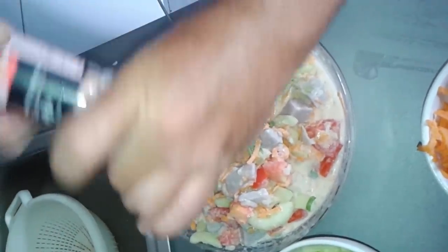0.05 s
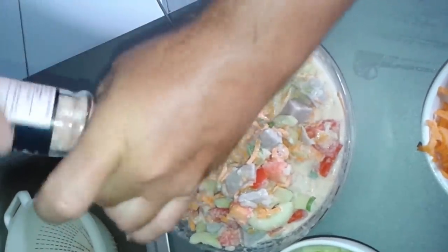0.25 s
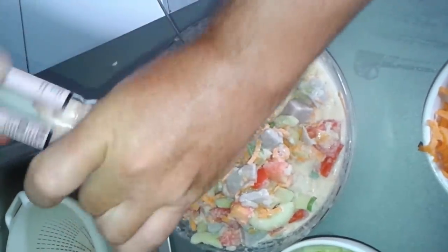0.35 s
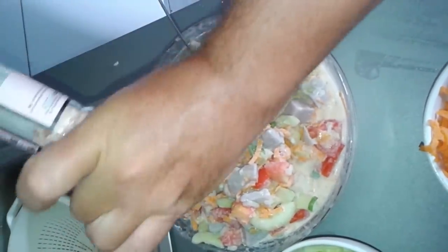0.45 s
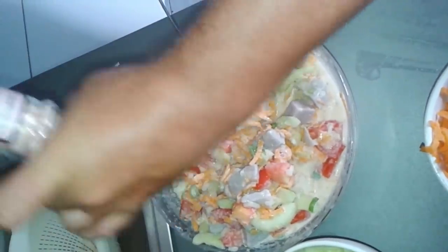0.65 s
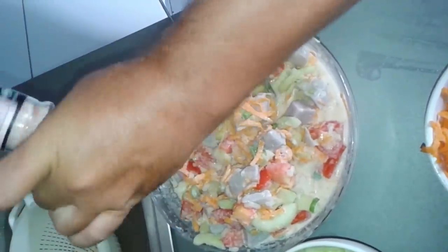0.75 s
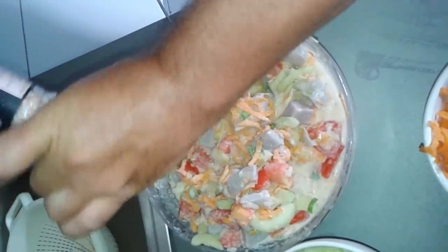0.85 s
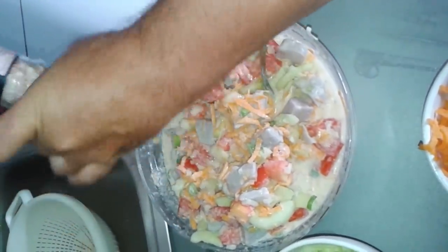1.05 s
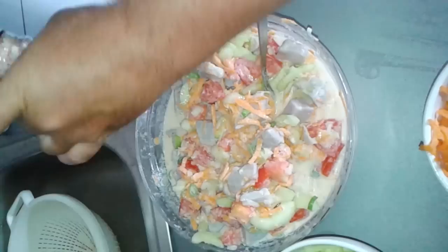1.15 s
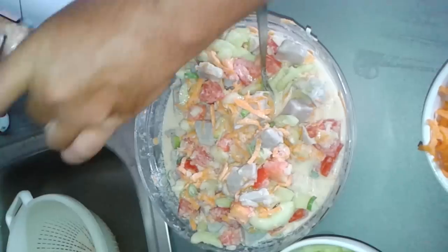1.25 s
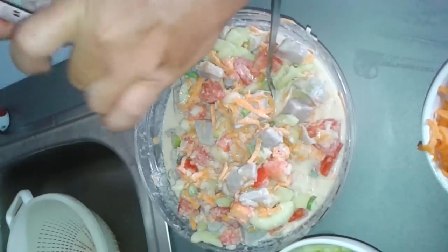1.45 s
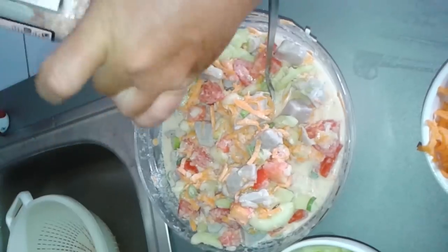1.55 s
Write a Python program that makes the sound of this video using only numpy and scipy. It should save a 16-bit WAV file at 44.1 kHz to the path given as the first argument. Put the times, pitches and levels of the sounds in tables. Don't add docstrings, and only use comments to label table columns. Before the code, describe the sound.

Coarse salt crystals crack and snap in a hand grinder, with loose grains ticking between twists

```python
import sys
import numpy as np
from scipy import signal
from scipy.fft import rfft, irfft, next_fast_len
from scipy.io import wavfile
from scipy.ndimage import map_coordinates

SR = 44100
rng = np.random.default_rng(int(sys.argv[2]) if len(sys.argv) > 2 else 0)


def convert_level_to_amplitude(level_db):
    exponent = np.asarray(level_db, float) / 20
    return 10 ** exponent


def store_pcm(level_fs):
    pcm = np.round(np.clip(level_fs, -1, 1) * 32767).astype(np.int16)
    wavfile.write(sys.argv[1], SR, np.atleast_2d(pcm).T)


N = 70560
LEAD = SR // 4
M = N + LEAD
T_S = (np.arange(M) - LEAD) / SR


def unit(x):
    return x / np.sqrt(np.mean(x ** 2) + 1e-20)


def along(points, hz):
    f, v = np.transpose(points)
    return np.interp(np.log(hz + 1), np.log(f + 1), v)


def filtered(x, response):
    m = next_fast_len(x.shape[-1] + 8192)
    hz = np.fft.rfftfreq(m, 1 / SR)
    return irfft(rfft(x, m) * response(hz), m)[..., :x.shape[-1]]


# f/Hz, density/dB per Hz
HUM_SPECTRUM = [(15, -12), (40, -17.5), (110, -10), (152, 3.5), (185, -7), (270, -2.5), (450, -14.5),
                (1000, -18.5)]
# f/Hz, density/dB per Hz
AIR_SPECTRUM = [(500, -64), (1000, 2), (2300, -11), (4500, -12), (7000, -5), (12000, -13), (15000, -10)]


def floor():
    hum_db, air_db, swell_db, swells_per_s = -51.5, -61, 1.5, 12

    def noise(points):
        top_hz = points[-1][0]
        return filtered(rng.standard_normal(M), lambda hz: convert_level_to_amplitude(along(points, hz) - 120 * (hz > top_hz)))

    wander = map_coordinates(rng.standard_normal(40), [np.arange(M) * swells_per_s / SR])
    hum = convert_level_to_amplitude(hum_db) * convert_level_to_amplitude(swell_db * wander) * unit(noise(HUM_SPECTRUM))
    return hum + convert_level_to_amplitude(air_db) * unit(noise(AIR_SPECTRUM))


# f/Hz, t60/s
KITCHEN_T60 = [(500, .5), (2000, 0.49), (6000, 0.41), (13000, .33)]


def kitchen(x):
    tails, delay = 12, 200
    hz, t, z = signal.stft(rng.standard_normal((tails, SR * 3 // 4)), SR, nperseg=256)
    decay = convert_level_to_amplitude(-60 * t / along(KITCHEN_T60, hz)[:, None])
    tail = signal.istft(z * decay, SR, nperseg=256)[1]
    tail = tail / np.linalg.norm(tail[0])
    position = np.arange(M) * (tails - 1) / M
    share = np.clip(1 - np.abs(position - np.arange(tails)[:, None]), 0, 1)
    wet = signal.fftconvolve(x * np.sqrt(share), tail, axes=1).sum(0)
    return np.pad(wet, (delay, 0))[:M]


# t/s, level/dB, f/Hz
CAP_JOLTS = [
    (0.2692, -32, 556),
    (0.2754, -35.5, 400),
    (.312, -34, 319),
    (0.673, -36, 472),
    (.752, -34.5, 347),
    (1.152, -35, 400),
]


def thuds():
    decay_cycles = 1.4
    out = np.zeros(M)
    for s, db, hz in CAP_JOLTS:
        cycles = hz * np.maximum(T_S - s, 0)
        out += convert_level_to_amplitude(db) * np.sin(2 * np.pi * cycles) * np.exp(-cycles / decay_cycles)
    return out


def body(x, peaks):
    low_cut_hz = 842

    def response(f):
        ring = 0
        for k, (centre, width, db) in enumerate(peaks):
            ring = ring + (-1) ** k * convert_level_to_amplitude(db) * 1j * f * width / (centre ** 2 - f * f + 1j * f * width)
        radiated = (-f * f / (low_cut_hz ** 2 - f * f + 1j * f * low_cut_hz)) ** 2
        return ring * radiated

    return filtered(x, response)


def bursts(times, gains, decay_s, rise_s):
    t = np.arange(SR // 50) / SR
    shape = (1 - np.exp(-t / rise_s)) * np.exp(-t / decay_s)
    start = np.round(times * SR).astype(int) + LEAD
    where = np.clip(start[:, None] + np.arange(len(t)), 0, M - 1).ravel()
    noise = rng.standard_normal((len(times), len(t))) * shape
    noise *= np.linalg.norm(shape / shape.max()) / np.linalg.norm(noise, axis=1)[:, None]
    return [np.bincount(where, (g[:, None] * noise).ravel(), M) for g in gains]


def struck(events, decay_s, rise_s):
    strike_db = 8.5
    s, db, low_db, high_db = np.transpose(events)
    return bursts(s, convert_level_to_amplitude(strike_db + db + np.array([low_db, high_db])), decay_s, rise_s)


# f/Hz, width/Hz, level/dB
CAP_MODES = [(1609, 342, -9.5), (2254, 527, -0.5), (3610, 1760, -7.5)]
# f/Hz, width/Hz, level/dB
JAR_MODES = [(2350, 900, -6), (5900, 1100, -4), (6950, 900, 0), (9800, 1800, -8)]
# t/s, peak level/dB, share in cap/dB, share in jar/dB
SALT_TICKS = [(.062, -40, -4, -4), (.1096, -42, -2, -6), (.1225, -39, -9, -1), (.1324, -41, -12, -1),
              (.1555, -35, 0, -10), (.1735, -40, -9, -1), (.5931, -41, -3, -4), (.623, -41, -9, -1),
              (.6305, -40, -9, -1), (1.0585, -41, -15, 0), (1.068, -40, 0, -14), (1.094, -45, -9, -1),
              (1.508, -43, -4, -4), (1.5574, -40, -5, -2), (1.5753, -39, -6, -2)]
# start t/s, end t/s, level/dB
SALT_SLIDES = [
    (0.117, 0.24, -53),
    (0.589, 0.685, -54),
    (1.06, 1.132, -59.5),
    (1.476, 1.593, -61),
]


def loose_salt():
    fade_s = 0.0093
    slide = np.zeros(M)
    for start, end, db in SALT_SLIDES:
        slide += convert_level_to_amplitude(db) * np.clip(np.minimum(T_S - start, end - T_S) / fade_s, 0, 1)
    draw = rng.random((1200, 2))
    grain_size = convert_level_to_amplitude(-4 * np.log(draw[:, 1]))
    grains, = bursts(draw[:, 0] * N / SR, [grain_size], decay_s=.002, rise_s=.00025)
    sliding = slide * unit(body(body(grains, JAR_MODES), JAR_MODES))
    cap, jar = struck(SALT_TICKS, decay_s=.002, rise_s=.0004)
    return sliding + body(cap, CAP_MODES) + body(body(jar, JAR_MODES), JAR_MODES)


# t/s, level/dB
TWIST_EFFORT = [
    [(-.2, -41), (-.08, -26.5), (-.06, -73)],
    [(.205, -55), (.22, -35), (.262, -31), (.272, -22.5), (.33, -27.5), (.35, -35.5), (.385, -26),
     (.4, -65)],
    [(.667, -48), (.672, -25.5), (.686, -37), (.7, -23.5), (.76, -30), (.79, -33), (.815, -28), (.835, -45)],
    [(1.121, -50), (1.126, -43), (1.155, -27), (1.168, -30.5), (1.21, -28), (1.265, -34), (1.28, -22),
     (1.3, -79.5)],
]
# burr/dB, grit/dB, shell/dB
STROKE_COLOURS = [(2.5, -9, -19), (-2, -19, -22.5), (-0.5, -4, -12.5), (-0.5, -4.5, -15)]
# t/s, peak level/dB, share in cap/dB, share in burr/dB
CRYSTAL_SNAPS = [(0.2077, -24, -8.5, -10), (0.2168, -16.5, -2.5, -29), (0.233, -12.5, -8, -14),
                 (0.251, -8.5, -7.5, -15), (0.2611, -17, -7, -9), (0.268, 2, -8.5, -11.5),
                 (0.2734, -1, -10.5, -8.5), (0.2964, -2.5, -15, -15), (0.3101, -5, -7, -16),
                 (0.3302, -7, -8, -15), (0.366, -3.5, -19, -10.5), (0.3805, -12, -6, -35),
                 (0.6687, -6, -19, -5), (0.6902, -12, -13, -10), (0.6991, -1.5, -13, -13.5),
                 (0.7023, -7.5, -21, -7.5), (0.7181, -3.5, -11, -14), (0.7344, -4.5, -19, -7),
                 (0.7395, -16, -16, -5), (0.7642, -1, -28, -11), (0.7689, -3.5, -16.5, -4.5),
                 (0.8034, -11, -17, -6), (1.1366, -19, -11, -19), (1.141, -12, -9, -16),
                 (1.1751, -4, -13, -8.5), (1.1804, -7.5, -10, -14), (1.1944, -26, -14, -21),
                 (1.2085, -6.5, -5.5, -17), (1.2144, -5, -6.5, -17), (1.2696, -4.5, -19, -7)]
# f/Hz, width/Hz, level/dB
BURR_MODES = [(5620, 1150, -2.8), (6514, 795, 0.76), (7660, 896, -4.4)]
# f/Hz, width/Hz, level/dB
GRIT_MODES = [(9270, 1270, -1.5), (12740, 3000, -10.5), (13600, 3900, -7)]
# f/Hz, width/Hz, level/dB
SHELL_MODES = [(1190, 350, 0)]


def crushing():
    cracks_per_s, crack_spread_db, crack_most_db, tilt_spread_db, rasp_db = 1300, 4, 8, 5, -3
    efforts = np.array([convert_level_to_amplitude(np.interp(T_S, *np.transpose(rows), left=-120, right=-120))
                        for rows in TWIST_EFFORT])
    draw = rng.random((3000, 3))
    s = np.cumsum(-np.log(draw[:, 0])) / cracks_per_s - LEAD / SR
    size = convert_level_to_amplitude(np.minimum(-crack_spread_db * np.log(draw[:, 1]), crack_most_db)) * (s < N / SR)
    tilt = convert_level_to_amplitude(tilt_spread_db * (2 * draw[:, 2] - 1))
    cracks = bursts(s, [size / tilt, size * tilt], decay_s=.0017, rise_s=.00021)
    low, high = [unit(c) + convert_level_to_amplitude(rasp_db) * rng.standard_normal(M) for c in cracks]
    burr_effort, grit_effort, shell_effort = convert_level_to_amplitude(STROKE_COLOURS).T @ efforts
    out = efforts.sum(0) * unit(body(low, CAP_MODES))
    out += burr_effort * unit(body(high, BURR_MODES))
    out += grit_effort * unit(body(high, GRIT_MODES))
    return out + shell_effort * unit(body(low, SHELL_MODES))


def snaps():
    grit_db = -8
    cap, burr = struck(CRYSTAL_SNAPS, decay_s=.0018, rise_s=.0006)
    return body(cap, CAP_MODES) + body(burr, BURR_MODES) + convert_level_to_amplitude(grit_db) * body(burr, GRIT_MODES)


def scene():
    room_db = -5
    near = crushing() + snaps() + loose_salt() + thuds()
    mid = near + convert_level_to_amplitude(room_db) * kitchen(near) + floor()
    return np.array([mid, mid])[:, LEAD:]


# f/Hz, level under the loudest band just before/dB
MASKING = [(60, -30), (180, -24), (700, -26), (1000, -33), (1300, -45), (8000, -48), (11000, -33),
           (15000, -32)]


def masked(x):
    scatter_db, split_s, split_length_s, split_db = 4, .7, .025, -14.5
    hz, t, z = signal.stft(x, SR, window="cosine", nperseg=2048)
    band = np.floor(6 * np.log(1 + hz / 800) + hz / 900).astype(int)
    power = np.array([np.mean(np.abs(z[0, band == b]) ** 2, 0) for b in range(band[-1] + 1)])
    loudest = power.max(0)
    before = np.maximum(np.roll(loudest, 1), np.roll(loudest, 2))
    over_db = 10 * np.log10(power / before + 1e-20) + scatter_db * rng.standard_normal(power.shape)
    audible = over_db[band] > along(MASKING, hz)[:, None]
    in_split = np.abs(t - split_s) < split_length_s / 2
    split = convert_level_to_amplitude(split_db) * in_split * rng.standard_normal(z.shape[1:])
    z = z * audible * [1 + split, 1 - split]
    return signal.istft(z, SR, window="cosine", nperseg=2048)[1][:, :N]


def band_limit(x):
    return signal.sosfilt(signal.butter(12, 15660, fs=SR, output="sos"), x)


def record(dry):
    top_hz = 14460
    limited = filtered(dry, lambda hz: 1 / (1 + (hz / top_hz) ** 90))
    mix = masked(limited)
    return band_limit(mix)


dry = scene()
out = record(dry)
store_pcm(out)
```